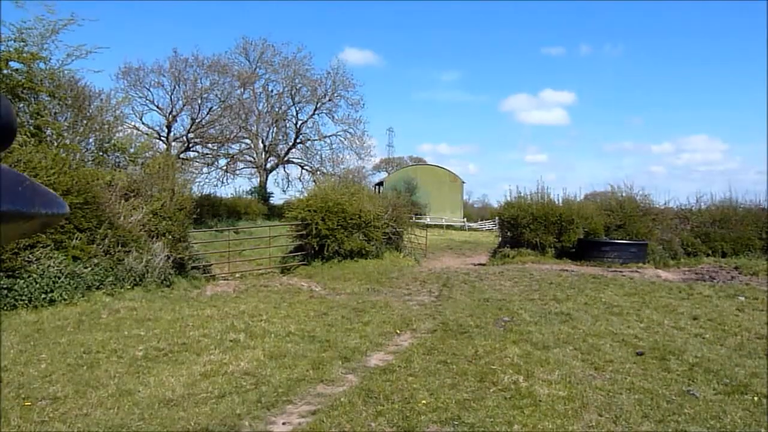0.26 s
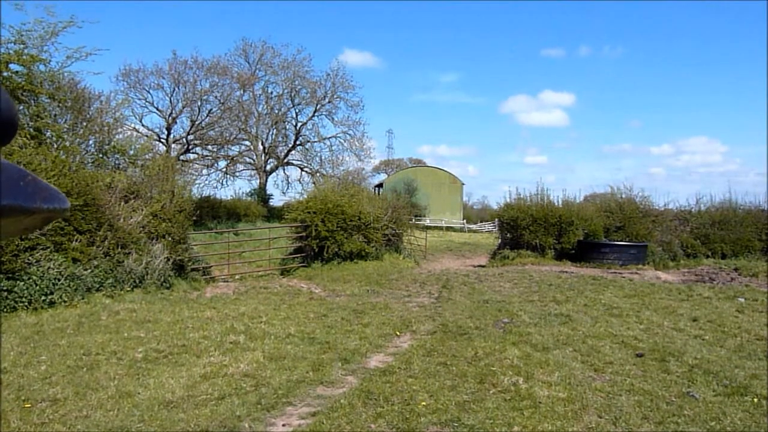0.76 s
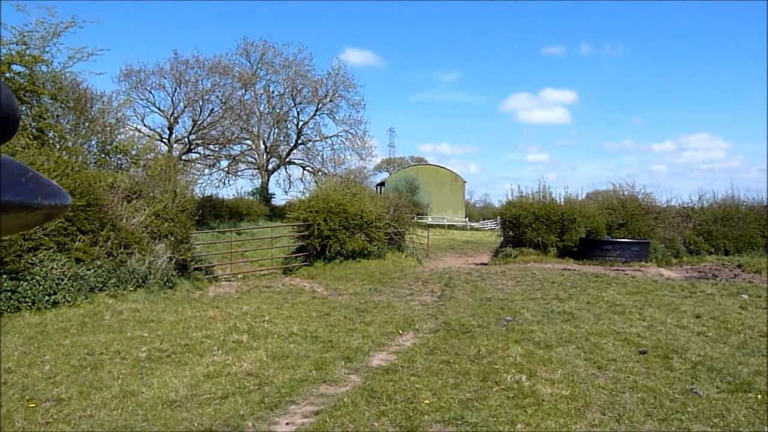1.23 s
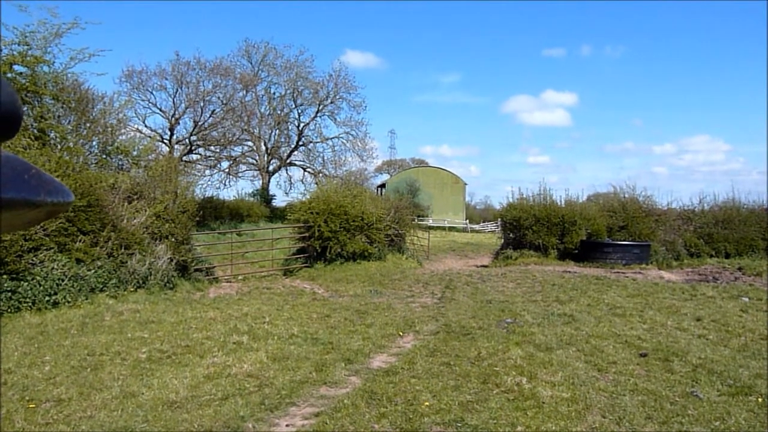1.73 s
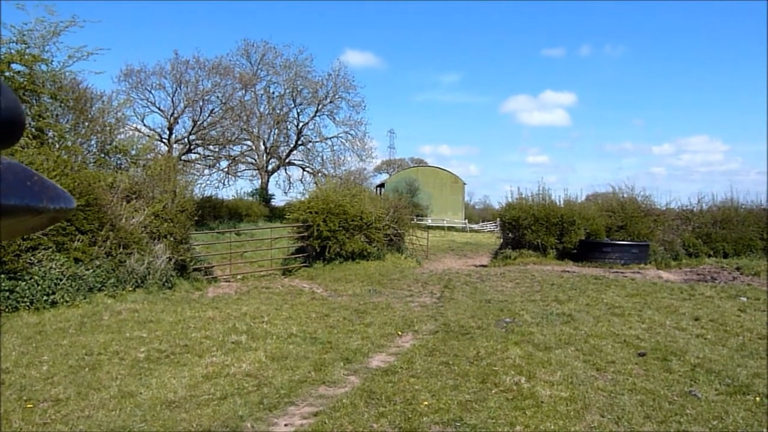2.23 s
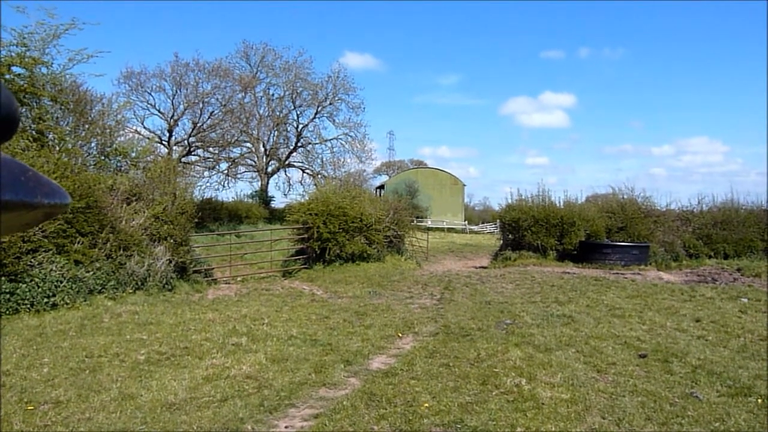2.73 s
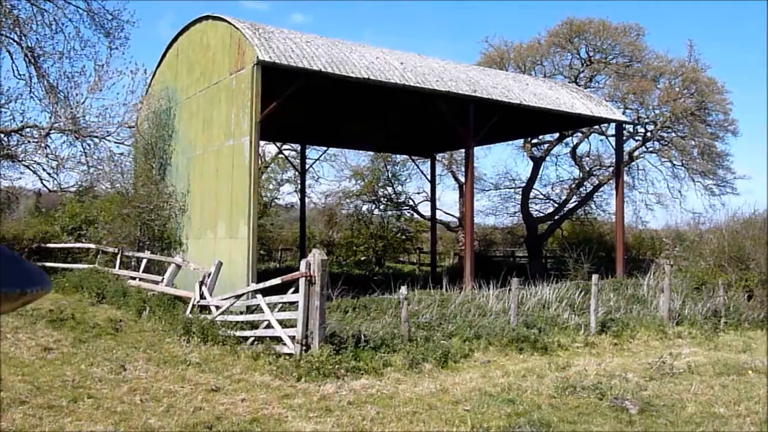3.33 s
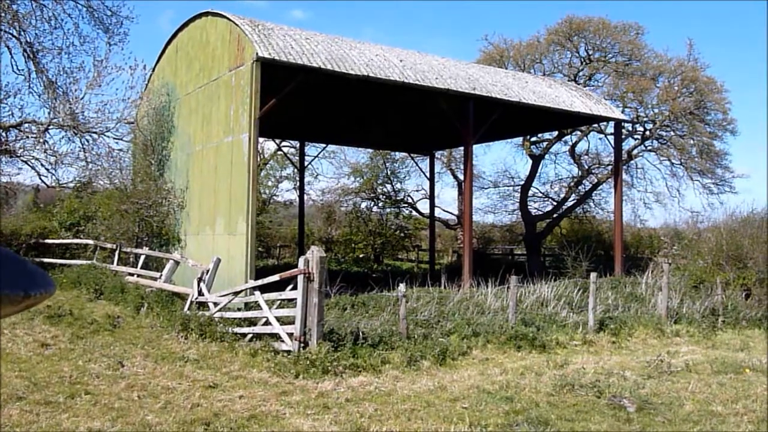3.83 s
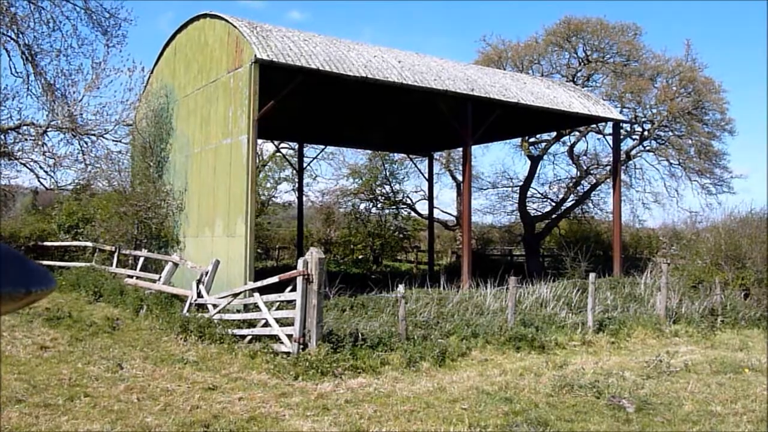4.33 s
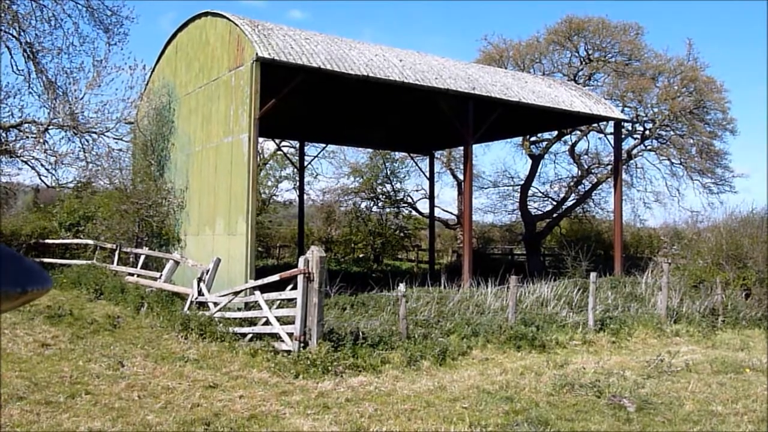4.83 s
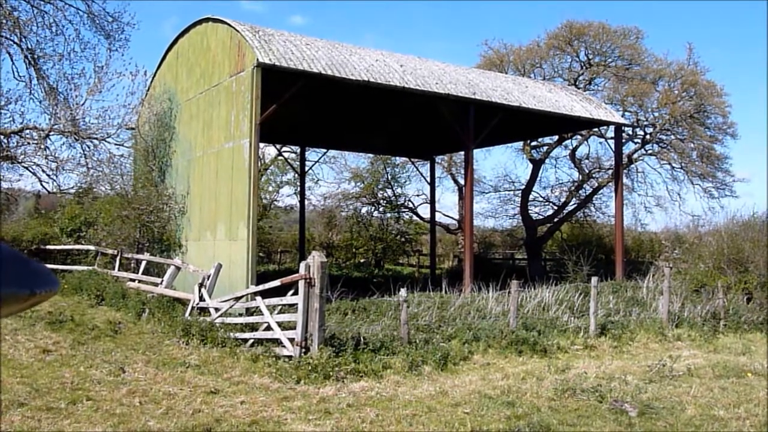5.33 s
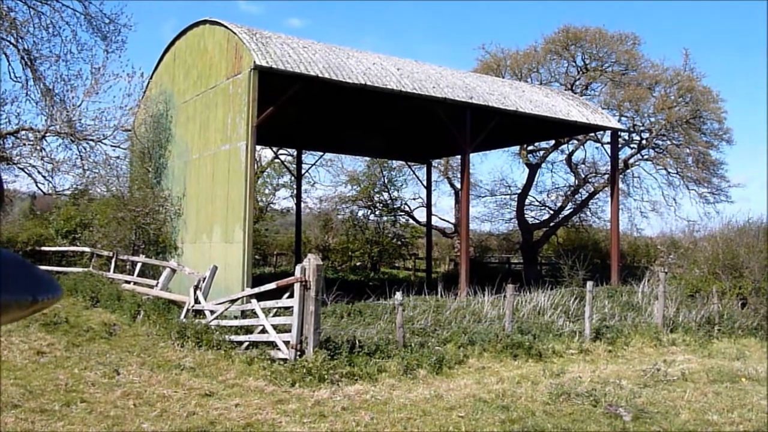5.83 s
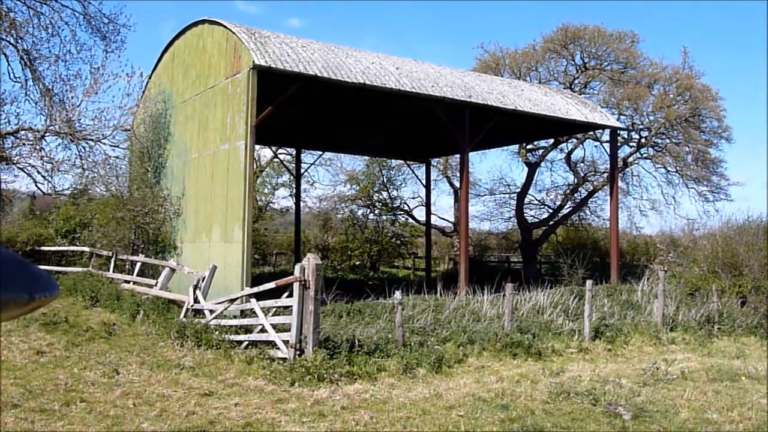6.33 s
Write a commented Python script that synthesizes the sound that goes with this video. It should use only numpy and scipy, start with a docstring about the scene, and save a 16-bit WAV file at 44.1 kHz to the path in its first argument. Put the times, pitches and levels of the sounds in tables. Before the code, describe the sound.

A small stereo microphone in an open grass field is buffeted by wind throughout. Low rumble and fluttering thumps, mostly below about 500 Hz, come in irregular bursts and lean left or right, with dry snaps and fine grit. A very brief dropout occurs at 0.05 s. Faint birds sit behind: a wavering warble at 0.55-0.75 s, thin falling whistles at about 1.1, 1.4, 1.7 and 2.0 s, and scattered chirps. The heaviest thumps and crunchy crackles cluster at 2.5-2.8 s. At 3.08 s a click marks a join; the soft background hush becomes fuller. Quick trills follow at about 3.1, 4.0, 5.0 and 6.0 s, the later ones introduced by rising notes. Arching whistles come at 3.4, 4.4, 5.4 and 6.3 s, with low whistles, husky notes and a small buzz near 3.9 s. Wind eases around 4.5 and 5.5-5.9 s, then thumps and snaps return from 6.0 s until the end at about 6.6 s.

```python
"""Wind rumbles and flutters first, on the two ports of a small stereo microphone carried over a grass field.
Eddies are shaped noise; buffets are short resonant bursts; dry snaps and grit are filtered pressure kinks.
Behind lie a soft hush of half-octave noise and small birds, near-sines that whistle, chirp, warble and trill.
Far sounds sink under loud wind; the sound drops out briefly near the start and a join clicks midway."""
import sys
import numpy as np
from scipy import signal
from scipy.io import wavfile
from scipy.ndimage import uniform_filter1d

SR = 44100
rng = np.random.default_rng(int(sys.argv[2]) if len(sys.argv) > 2 else 0)


def dump_mix(stems):
    """Bounce the given channels to the path in sys.argv[1] as a 16-bit WAV at rate SR."""
    frames = np.atleast_2d(stems).T  # one column per channel
    limited = np.clip(frames, -1, 1)  # hard clip at full scale
    pcm = np.round(limited * 32767).astype(np.int16)
    wavfile.write(sys.argv[1], SR, pcm)


def gain_from_decibels(decibels):
    """Convert decibel values to linear amplitude factors."""
    exponent = np.asarray(decibels, float) / 20
    return 10 ** exponent


N = 290001
T = np.arange(N) / SR
JOIN_S = 3.0755   # a click; from here the low hush is fuller and the songs are heard
GUST_DB = -23.5   # flutter level in the wind table that counts as a gust


def rms_one(x):
    """Normalisation: each channel is scaled to unit root-mean-square."""
    return x / np.sqrt(np.mean(x ** 2, axis=-1, keepdims=True) + 1e-20)


def in_time(rows, t=T):
    """Linear interpolation: every column after the first becomes a curve over time."""
    s, *columns = np.transpose(rows)
    return [np.interp(t, s, c) for c in columns]


def at_hz(points, hz):
    """Spectral interpolation: level is read off along a logarithmic frequency axis."""
    points = np.array(points)
    return np.interp(np.log(hz), np.log(points[:, 0] + 1), points[:, 1])


def cut(x, hz, kind, order=2):
    """Linear filtering: a Butterworth low-, high- or band-pass."""
    return signal.sosfilt(signal.butter(order, hz, kind, fs=SR, output="sos"), x)


def drift(rate_hz, channels=1):
    """Slow random modulation: noise at every 40th sample through a double one-pole low-pass; spread 1."""
    r = np.exp(-80 * np.pi * rate_hz / SR)
    white = rng.standard_normal((channels, N // 40 + 502))
    slow = signal.lfilter([1], [1, -2 * r, r * r], white)[:, 500:]   # past the filter's start
    return np.array([np.interp(np.arange(N) / 40, np.arange(len(row)), row) for row in rms_one(slow)])


def bands(low_hz, high_hz):
    """Band synthesis: half-octave bands of left and right noise, each of rms 1, with its centre/Hz."""
    edges = low_hz * 2 ** np.arange(0, np.log2(high_hz / low_hz) + .5, .5)
    white = rng.standard_normal((2, 2, N))   # neighbouring bands draw on different noise
    for k, pair in enumerate(zip(edges, edges[1:])):
        yield np.sqrt(pair[0] * pair[1]), rms_one(cut(white[k % 2], pair, "band"))


def sing(out, rows, bend=None, husky=.1, fade_s=.007, size=600):
    """Frequency modulation: adds a near-sine; bend(t) offsets pitch/Hz and scales gain, huskiness roughens."""
    i = np.arange(round(rows[0][0] * SR), min(round(rows[-1][0] * SR), N))
    hz, db = in_time(rows, i / SR)
    hz = uniform_filter1d(hz, size, mode="nearest")   # the pitch bends, it has no corners
    shift, gain = bend(i / SR - rows[0][0]) if bend else (0, 1)
    fade = np.clip(np.minimum(i - i[0], i[-1] - i) / (fade_s * SR), 0, 1)
    rough = 1 + husky * rms_one(cut(rng.standard_normal(len(i)), 250, "low"))
    waver_hz = 250 * husky * rms_one(cut(rng.standard_normal(len(i)), 120, "low"))
    phase = 2 * np.pi * np.cumsum(hz + shift + waver_hz) / SR
    note = np.sqrt(2) * gain_from_decibels(db) * gain * fade * rough * np.sin(phase)
    return out + np.bincount(i, note, N)


def bent(s, length, start_hz, middle_hz, end_hz, db):
    """Parabolic glide: rows of a note through three pitches, 3 dB softer at both ends."""
    u = np.linspace(0, 1, 9)
    parabola = np.polyfit([0, .5, 1], [start_hz, middle_hz, end_hz], 2)
    return np.transpose([s + length * u, np.polyval(parabola, u), db - 3 * (2 * u - 1) ** 2])


# Strength of the wind on the ports, before the layer gains: [t/s, flutter level/dB, rumble level/dB]
WIND = [(0.08, -35.5, -32), (0.23, -20, -27), (0.27, -29.5, -35.5), (0.35, -21, -30), (0.46, -41, -33.5),
        (0.55, -18.5, -30), (0.6, -41, -36), (0.66, -17, -30), (0.69, -37.5, -25), (0.71, -22, -38),
        (0.75, -39.5, -38.5), (0.88, -40, -26), (0.97, -45, -37.5), (1.02, -36.5, -23),
        (1.15, -38.5, -32.5), (1.2, -21.5, -25), (1.25, -26, -38.5), (1.32, -33, -33), (1.37, -27.5, -31.5),
        (1.55, -40.5, -32.5), (1.595, -19.5, -27.5), (1.64, -37.5, -27), (1.68, -23.5, -30.5),
        (1.78, -30.5, -31), (1.92, -36.5, -37.5), (2.02, -31.5, -27.5), (2.05, -20.5, -27),
        (2.07, -50.5, -39), (2.29, -47, -31.5), (2.34, -22, -30.5), (2.45, -35.5, -35), (2.49, -26, -36.5),
        (2.6, -29, -29.5), (2.62, -42.5, -45.5), (2.65, -31.5, -37.5), (2.81, -29, -30.5),
        (2.97, -28.5, -28.5), (3.03, -27.5, -31), (3.1, -52, -44.5), (3.17, -40.5, -25.5),
        (3.21, -23.5, -36), (3.26, -38, -33), (3.43, -31, -29), (3.66, -35.5, -35.5), (3.73, -29.5, -24.5),
        (3.77, -39, -38.5), (3.9, -27.5, -37), (3.95, -39, -32.5), (4.08, -30.5, -32.5),
        (4.09, -34.5, -32.5), (4.55, -52, -39.5), (4.6, -42, -33.5), (4.66, -29.5, -29.5),
        (4.7, -26, -25.5), (4.75, -26.5, -36.5), (4.78, -40, -35.5), (4.82, -39.5, -34), (4.93, -62, -42.5),
        (5.04, -43, -33.5), (5.07, -26, -28.5), (5.16, -26.5, -29), (5.2, -37, -43.5), (5.27, -23, -30),
        (5.44, -41.5, -38.5), (5.45, -55.5, -46), (5.8, -38.5, -32.5), (6.0, -38, -39), (6.03, -21, -36),
        (6.16, -37, -28), (6.18, -28, -46), (6.25, -23, -31), (6.3, -22, -29.5), (6.39, -45.5, -39),
        (6.47, -27, -38), (6.5, -24.5, -23.5), (6.58, -31, -40.5)]
# Mean spectrum of the eddies, relative: [f/Hz, spectral density level/dB per Hz]
TURBULENCE = [(15, -41), (25, -4), (112, 4.5), (277, 6), (430, -5), (475, -7), (1190, -71), (1750, -60.5),
              (3000, -53), (3900, -78), (6600, -120)]


def wind():
    """Turbulence: eddies in lumps shake all bands, upper ones hardest; each port gets its own share."""
    lump_db, lump_db_per_octave, own_db = 2.5, 2.5, 1.5
    apart, reach = 0.63, 2.04   # share of each port alone; limit of the lumps
    rumble_gain_db, flutter_gain_db = 6, 4
    veer_db, veer_hz = 4, 7.6   # the wind veers at random between the ports
    flutter_db, rumble_db = in_time(WIND)
    common = 0.44 * drift(27) + drift(90)
    lumps = rms_one(common + apart * (drift(23, channels=2) + drift(66, channels=2)))
    lumps = reach * np.tanh(lumps / reach)   # the largest bursts are the buffets
    rumble, flutter = 0, 0
    for hz, noise in bands(26.16, 1700):
        octaves = max(np.log2(hz / 90), 0)
        depth_db = lump_db + lump_db_per_octave * octaves
        band_db = at_hz(TURBULENCE, hz) + depth_db * lumps + own_db * drift(15, channels=2)
        band = noise * np.sqrt(hz) * gain_from_decibels(band_db)   # bandwidth grows with the centre
        band *= gain_from_decibels(.45 * max(np.log2(hz / 400), 0) * (flutter_db - GUST_DB))   # faster air is brighter
        upper = np.clip(octaves - .6, 0, 1)
        rumble = rumble + (1 - upper) * band
        flutter = flutter + upper * band
    rumble = rms_one(rumble) * gain_from_decibels(rumble_db + rumble_gain_db)
    flutter = rms_one(flutter) * gain_from_decibels(flutter_db + flutter_gain_db)
    return (rumble + flutter) * gain_from_decibels(veer_db * drift(veer_hz) * [[.5], [-.5]])


def grit():
    """Impulse noise: small random kinks ride on the flutter, louder and denser as it strengthens."""
    per_s, level_db = 600, -34   # at gust strength
    size_follows, rate_follows = 0.27, 0.17   # dB per dB of flutter
    gust_db = in_time(WIND)[0] - GUST_DB
    born = rng.random((2, N)) < per_s * gain_from_decibels(rate_follows * gust_db) / SR
    sizes = gain_from_decibels(4 * np.minimum(rng.exponential(1, (2, N)), 3)) * rng.choice([-1, 1], (2, N))
    kinks = born * sizes * gain_from_decibels(size_follows * gust_db + level_db) + 1e-18
    sharp_edge = gain_from_decibels(-18.5) * cut(kinks, 2400, "low")
    return cut(cut(kinks, 1300, "low", order=3) + sharp_edge, 440, "high", order=1)


# Colour of the open-air hush, relative: [f/Hz, spectral density level/dB per Hz]
HUSH_COLOUR = [(200, 22.5), (500, 25), (1100, 20.5), (1700, 4.5), (2800, 4), (5000, 0), (7000, -10),
               (8000, 2)]


def hush():
    """Diffuse field: far leaves and air make smooth noise, partly common to both sides."""
    alike, patchy_db = .2, .5
    level_db = -69   # of its 5.5 to 7 kHz part, before ducking
    out = 0
    for hz, noise in bands(206, 8000):
        before_join_db = -7 * (hz < 1800) * (T < JOIN_S)
        out = out + noise * np.sqrt(hz) * gain_from_decibels(at_hz(HUSH_COLOUR, hz) + patchy_db * drift(1.4) + before_join_db)
    out = out + alike * out[::-1]
    return out / np.std(cut(out, [5500, 7000], "band", order=4)) * gain_from_decibels(level_db)


def ducking(air):
    """Automatic gain: far sounds sink at once with loud wind and swell back at a steady rate."""
    above_db, share, recover_db_per_s = -25, 0.88, 21.5
    level_db = 10 * np.log10(uniform_filter1d(np.mean(air ** 2, axis=0), size=800) + 1e-12)
    depth_db = share * np.maximum(level_db - above_db, 0) + recover_db_per_s * T
    return gain_from_decibels(recover_db_per_s * T - np.maximum.accumulate(depth_db))


# Dry snaps at the sharpest pressure tips, before gains and filters:
# [t/s, level/dB, bright tick against it: level/dB, left-right level/dB]
SNAPS = [(0.0362, -30.5, -1.5, -2.5), (0.0755, -30.5, -14, -4.5), (0.1234, -28.5, -24, 3.5),
         (0.144, -41, -18, -11), (0.166, -23.5, -23.5, -1), (0.223, -44, -22, -5), (0.2414, -41, -31, 3.5),
         (0.2825, -31, -30, -9.5), (0.302, -22, -31, 0.5), (0.3174, -47, -22, -3), (0.3434, -35, -25, 3),
         (0.4125, -42, -14, -1), (0.453, -51, -17, 3), (0.5447, -39, -32, 9.5), (0.562, -32.5, -28, 3.5),
         (0.6634, -29, -15, -4.5), (0.687, -40, -26, 3), (0.714, -24.5, -14.5, 1),
         (0.7195, -33.5, -23, 6.5), (0.857, -28, -16, -6), (0.888, -47.5, -16, 6.5),
         (1.0146, -31, -21, 5.5), (1.0525, -27, -21, 1.5), (1.2072, -29, -43, -3), (1.339, -42, -17, -5.5),
         (1.3673, -32, -15, 1.5), (1.4441, -52, -15, -11), (1.4827, -22, -13.5, -7.5),
         (1.6705, -37, -27, 0), (1.7482, -34.5, -36, 2), (1.7714, -33, -21, 2), (1.8535, -37.5, -38, 4.5),
         (2.0016, -45, -17, 6.5), (2.048, -36.5, -15, 2), (2.3428, -18, -22.5, -3), (2.4724, -50, -28, -9),
         (2.4854, -23, -14, 3.5), (2.52, -5, -31, -7.5), (2.5465, -29, -27, -4), (2.583, -17.5, -21, -5),
         (2.5917, -16.5, -22, -5), (2.608, -39, -14, -2), (2.6355, -10.5, -17, -12),
         (2.6514, -33, -24.5, 2.5), (2.6698, -28, -37, 4), (2.703, -47, -9, -2), (2.7336, -30.5, -17, 6.5),
         (2.7377, -42, -11, 7), (2.745, -44, -14, -4), (2.7576, -29, -24, 4.5), (2.7836, -31, -35, -0.5),
         (2.807, -46.5, -5, -3), (2.9319, -24, -23, -0.5), (3.025, -29, -45, 0.5),
         (3.1991, -18.5, -17.5, -7), (3.4391, -26, -18.5, 2), (3.482, -31.5, -19, -0.5),
         (3.5387, -34.5, -7.5, -6.5), (3.5602, -29.5, -23, 9), (3.7299, -19, -23, -8),
         (3.8901, -42, -11.5, 6), (4.0613, -21, -16, -6), (4.152, -40.5, -22, 6.5),
         (4.6643, -23, -20.5, -3.5), (4.6885, -50.5, -18, -10), (4.696, -25, -22, 7.5),
         (4.7397, -27, -41, 3.5), (5.0613, -32, -17, 8), (5.0845, -37.5, -21, 10), (5.091, -21.5, -38, 2.5),
         (5.1123, -28, -34, 5), (5.1276, -26, -38, 3), (5.141, -24.5, -11, -7.5), (5.1522, -30.5, -36, 3),
         (5.1724, -25, -45, 5.5), (5.234, -44, -37, -5), (5.2639, -35.5, -39, 4.5), (5.2894, -33.5, -29, 6),
         (5.3174, -55, 0, 2.5), (5.3788, -24, -20, 0), (5.8567, -33, -26.5, 3), (6.0245, -43.5, -25, -16),
         (6.0284, -9.5, -24, -2.5), (6.0376, -36, -16, -3), (6.06, -13.5, -23, 0.5),
         (6.063, -43, -22.5, -12), (6.0675, -22.5, -39, 1), (6.089, -42, -29, 7), (6.2414, -19, -14, -11.5),
         (6.28, -40.5, -16, 6), (6.331, -22, -21.5, -3), (6.4662, -30, -33, 4), (6.487, -34, -11.5, 1),
         (6.5085, -47.5, -6, 7), (6.552, -53, -9, -4)]


def snaps():
    """Impulse response: a pressure kink gives a dull click and bright tick, then a weaker opposite pair."""
    body_gain_db, tick_gain_db = 27, 23
    lag_s, after_s, after_db = 0.00019, 0.0037, -10   # greatest port lag; scales of the second kink
    tick_late_s = .0012   # the tick sits on the tip of the dull click
    body, ticks, strength = np.zeros((3, 2, N + 900))
    chance = rng.random((len(SNAPS), 4))
    for (s, level_db, tick_db, pan_db), draw in zip(SNAPS, chance):
        for side in (0, 1):
            delays = lag_s * draw[side] + after_s * np.array([0, .5 + draw[2]])
            at = np.round((s + delays) * SR).astype(int)
            pair = np.array([1, -gain_from_decibels(after_db * draw[3])])
            size = gain_from_decibels(level_db + (1.5 - side) * pan_db) * pair
            strength[side, at[0]] += size[0]
            body[side, at] += size * gain_from_decibels(body_gain_db)
            tick_at = at + round((tick_late_s - lag_s * draw[side]) * SR)
            ticks[side, tick_at] += size * gain_from_decibels(tick_db + tick_gain_db)
    clicks = cut(body[:, :N] + 1e-18, 900, "low", order=3)
    dull = cut(clicks + scrunch(strength[:, :N]), 440, "high", order=1)
    return dull + cut(ticks[:, :N] + 1e-18, (1300, 3600), "band", order=1)


def scrunch(strength):
    """Envelope modulation: uneven noise swells just before each snap and dies after it."""
    level_db, swell_s, band_hz = -12, 0.0033, (600, 1560)
    t = np.arange(-2000, 2001) / SR
    swell = signal.fftconvolve(strength, np.exp(-np.abs(t) / swell_s)[None], "same", axes=1)
    noise = cut(rng.standard_normal((2, N)), band_hz, "band")
    noise = rms_one(cut(noise, band_hz[1], "low", order=3))
    return gain_from_decibels(level_db + 4 * drift(120, channels=2)) * swell * noise


# Thin high ticks, before the band-pass: [t/s, level/dB]
HIGH_TICKS = [(0.0375, -34), (6.5094, -29.5)]


def high_ticks():
    """Band-limited transient: noise under a two-sided exponential envelope, in a high band."""
    envelope = sum(gain_from_decibels(db) * np.exp(-np.abs(T - s) / .002) for s, db in HIGH_TICKS)
    return cut(envelope * rng.standard_normal((2, N)), (6260, 8200), "band")


# Buffets, before the last low-pass: [t/s, peak level/dB at the right port, f/Hz, left-right level/dB]
BUFFETS = [(0.074, -11.5, 207, 5.5), (0.279, -4.5, 368, -4), (0.335, -18.5, 262, -16),
           (0.65, -16.5, 332, -4), (0.708, -5.5, 272, 0), (0.791, -13.5, 150, 5.5), (0.882, -21, 216, 7.5),
           (1.014, -15.5, 145, 8.5), (1.049, -12, 215, 3.5), (1.197, -12, 143, -12),
           (1.29, -26.5, 304, 10.5), (1.48, -4.5, 221, -3), (1.571, -20.5, 397, 8.5), (1.674, -15, 289, 7),
           (1.743, -6.5, 159, -14), (1.994, -23.5, 215, 15.5), (2.044, -29, 275, 9), (2.335, -8.5, 182, -3),
           (2.481, -7.5, 297, 11.5), (2.546, -5, 292, -5.5), (2.583, -2, 245, -14), (2.629, -6.5, 396, 0.5),
           (2.666, -19.5, 293, 12), (2.729, -6, 360, -10), (2.815, -13.5, 313, 0), (2.932, -7, 200, -9.5),
           (2.95, -15, 280, -2), (3.194, -13, 349, 3.5), (3.378, -22, 148, -15), (3.474, -6, 156, -13),
           (3.711, -18, 161, 4), (3.859, -24.5, 227, 15), (3.887, -14, 174, 3.5), (4.056, -7, 333, -5),
           (4.147, -12.5, 200, 1.5), (4.465, -32.5, 254, 8.5), (4.644, -6, 180, -9), (4.69, -12, 288, 6.5),
           (4.732, -9.5, 280, -2), (5.061, -8, 241, 6), (5.111, -7.5, 415, -1.5), (5.136, -13.5, 387, 10),
           (5.231, -9, 437, -5), (5.312, -10, 259, -4.5), (5.376, -13.5, 339, 3), (5.419, -11, 254, 5),
           (6.027, -6.5, 230, -27), (6.054, -19.5, 203, 9.5), (6.172, -20, 252, 8.5), (6.221, -25, 234, 17),
           (6.278, -18, 260, 7.5), (6.46, -13.5, 250, 6)]


def buffets():
    """Damped resonance: a burst of pressure lasts a few cycles and hits the ports a little apart."""
    rise_s, fall_s, lag_s = 0.0018, 0.0048, 0.00086
    width, dull = 1.26, 1.96   # band edges and low-pass, as ratios to the pitch
    out, t = np.zeros((2, N + 3000)), np.arange(2000) / SR
    shape = np.exp(-t / fall_s) * (1 - np.exp(-t / rise_s))
    noise = rng.standard_normal((len(BUFFETS), 2, 2000))
    lags = np.abs(rng.standard_normal((len(BUFFETS), 2))) * lag_s
    for (s, peak_db, hz, pan_db), white, lag in zip(BUFFETS, noise, lags):
        burst = cut(white * shape, [hz / width, hz * width], "band", order=1)
        burst = cut(burst, hz * dull, "low")
        for side in (0, 1):
            at = round((s + lag[side]) * SR)
            gain = gain_from_decibels(peak_db + (1 - side) * pan_db)
            out[side, at:at + 2000] += gain * burst[side] / np.abs(burst[side]).max()
    return out[:, :N]


def far_chorus(level_db=-72, count=90):
    """Random superposition: faint short sweeps of distant birds, unrelated on the two sides."""
    out = np.zeros((2, N))
    for k, (when, pitch, glide, length, loud) in enumerate(rng.random((count, 5))):
        s = when * (N / SR - .1)
        hz, db = 2500 * 2 ** (1.15 * pitch), level_db + 8 * loud
        end = (s + .015 + .035 * length, hz * (.8 + .35 * glide), db)
        out[k % 2] = sing(out[k % 2], [(s, hz, db), end], husky=.4)
    return out


# Stretches of dense fine crackle, perhaps grass crushed under foot: [t/s, length t/s, level/dB]
CRUSH = [(.2, 0.206, -51), (1.17, 0.136, -53.5), (2.483, .13, -42.5), (2.724, 0.054, -46),
         (4.657, 0.11, -47.5), (5.054, 0.16, -43.5), (6.02, 0.077, -44)]


def crush():
    """Shot noise: dense clicks of uneven size, in clumps that fade in and out, partly opposed at the ports."""
    per_s, band_hz = 1800, (550, 1500)
    stretch = 0
    for s, length, db in CRUSH:
        stretch = stretch + gain_from_decibels(db) * np.clip(np.minimum(T - s, s + length - T) / .012 + 1, 0, 1)
    clicks = (rng.random((2, N)) < per_s / SR) * rng.standard_normal((2, N)) * gain_from_decibels(3 * drift(60))
    return stretch * rms_one(cut(clicks - .5 * clicks[::-1], band_hz, "band"))


# Short chirps: [t/s, length t/s, start f/Hz, middle f/Hz, end f/Hz, level/dB]
CHIRPS = [(.485, .02, 2580, 2650, 2760, -65), (.559, .024, 2830, 3000, 3150, -55),
          (.658, .044, 5270, 4850, 4250, -55), (.806, .028, 2380, 2650, 2760, -59),
          (.81, .04, 5200, 5450, 5600, -64), (.876, .022, 4200, 4600, 5200, -59),
          (.899, .025, 2730, 2950, 3110, -61), (.953, .03, 4170, 4050, 3900, -63),
          (1.08, .015, 2960, 3020, 3080, -57), (1.668, .022, 3830, 4250, 4680, -53),
          (1.82, .05, 4850, 4950, 4680, -63), (1.965, .04, 3520, 3870, 3390, -57),
          (3.49, .06, 2230, 2260, 2250, -63), (2.15, .02, 4000, 4150, 4050, -62),
          (2.5, .02, 4550, 4420, 4300, -62), (3.002, .016, 3850, 3500, 3150, -60),
          (3.58, .03, 2700, 2750, 2650, -61), (4.098, .02, 3280, 3470, 3560, -59),
          (4.995, .06, 4300, 4650, 4150, -61), (4.955, .015, 5800, 6000, 6200, -62),
          (5.547, .064, 4130, 4660, 4130, -58), (5.684, .027, 4220, 4180, 4130, -59),
          (5.866, .048, 4230, 4080, 3000, -63), (5.937, .074, 3800, 4620, 4150, -51),
          (6.087, .048, 3700, 3620, 3520, -55), (6.182, .046, 3330, 3150, 3080, -57),
          (6.226, .02, 3850, 4200, 4650, -59)]


def chirps(calls):
    """Frequency sweep: short notes glide along a parabola in pitch."""
    for row in CHIRPS:
        calls = sing(calls, bent(*row), husky=.17, size=100)
    return calls


# Warble: [t/s, middle f/Hz, level/dB]
WARBLE = [(0.531, 4800, -57), (0.544, 4180, -62), (0.62, 3850, -50), (0.7, 3670, -55.5), (0.758, 3930, -62)]


def warble(calls):
    """Vibrato: a gliding note whose pitch wavers as a cosine."""
    waver_hz, per_s, top_s = 150, 21.5, .57   # depth to either side, rate, time of one highest pitch

    def waver(t):
        """Sinusoidal modulation: the pitch offset about the middle."""
        return waver_hz * np.cos(2 * np.pi * per_s * (t + WARBLE[0][0] - top_s)), 1

    return sing(calls, WARBLE, waver, husky=.15, size=200)


# Shape of the falling whistle: [t/s into the call, f/Hz, relative level/dB]
FALL = [(0, 5300, 4), (.025, 4790, -7), (.125, 3920, -8), (.15, 3570, -1.5)]
# Its calls: [t/s, level/dB]
FALLS = [(1.12, -61), (1.392, -63.5), (1.696, -67), (2.001, -60.5)]


def falling_whistles(calls):
    """Downward glide: one pitch contour is repeated at several times and levels."""
    for s, db in FALLS:
        calls = sing(calls, np.array(FALL) + [s, 0, db], husky=.3)
    return calls


# Songs: [t/s, notes level/dB, trill level/dB, trill length t/s, trill rate f/Hz, upstroke f/Hz,
# gain of each trill note's second half]
SONGS = [(2.856, -55, -45, .235, 42.3, 1300, 1), (3.742, -59, -59, .32, 40.3, 600, .2),
         (4.752, -51, -46, .32, 40.3, 600, .2), (5.748, -61, -64, .27, 40.3, 600, .2)]


def songs():
    """Gating: this singer is heard only after the join."""
    return sum(song(*row) for row in SONGS) * (T > JOIN_S)


# Rising notes of a song: [t/s into the song, length t/s, relative level/dB]
RISING = [(0, .035, -2), (.07, .033, -3), (.135, .04, 0)]


def song(s, notes_db, trill_db, length, *note):
    """Frequency modulation: three rising notes, then a trill that settles in pitch and fades."""
    start_hz, end_hz, settle_s = 5600, 4580, .065   # trill
    after_s, fade_db_per_s = .225, 45   # trill
    out, t = np.zeros(N), np.linspace(0, length, 12)
    for after, held, db in RISING:
        first = (s + after, 4650, notes_db + db)
        last = (s + after + held, 5200, notes_db + db)
        out = sing(out, [first, last], size=100)
    hz = end_hz + (start_hz - end_hz) * np.exp(-t / settle_s)
    rows = np.transpose([s + after_s + t, hz, trill_db - fade_db_per_s * t])
    return sing(out, rows, lambda t: trill_note(t, *note), fade_s=0.0018)


def trill_note(t, per_s, rise_hz, second):
    """Periodic modulation: each note sweeps to its top, catches briefly and ends on a softer, sagging half."""
    beat = t * per_s % 1
    shift_hz = -rise_hz * np.exp(-beat / .14) - 300 * beat
    catch = 1 - .85 * np.exp(-((beat - .52) / .06) ** 2)
    fade = np.clip(beat / .08, 0, 1) * np.clip((.92 - beat) / .12, 0, 1)
    return shift_hz, fade * catch * (1 - .6 * beat) * np.where(beat > .52, second, 1)


# Long low whistles: [t/s, length t/s, start f/Hz, middle f/Hz, end f/Hz, level/dB]
WHISTLES = [(3.09, .05, 1750, 2100, 2400, -60), (3.14, .26, 2340, 2290, 2280, -63),
            (4.17, .2, 2000, 2090, 2030, -62), (4.365, .145, 2050, 1880, 1670, -57)]


def low_whistles(calls):
    """Slow glide: long near-sines follow a parabola in pitch."""
    for row in WHISTLES:
        calls = sing(calls, bent(*row), husky=.17, size=100)
    return calls


# Shape of the arching whistle: [t/s into the call, f/Hz, relative level/dB]
ARCH = [(0, 3150, -10), (.02, 3680, -7), (.04, 3880, -5), (.08, 3920, -4), (.125, 3850, -2), (.19, 3500, 0),
        (.25, 3100, -5), (.285, 2880, -14)]
# Its calls: [t/s, level/dB]
ARCHES = [(3.378, -59), (4.378, -55), (5.368, -59), (6.318, -61)]


def arching_whistles(calls):
    """Arched glide: one contour rises, then falls, at several times and levels."""
    for s, db in ARCHES:
        calls = sing(calls, np.array(ARCH) + [s, 0, db], husky=.14)
    return calls


# Husky notes: [t/s, length t/s, start f/Hz, middle f/Hz, end f/Hz, level/dB]
LOW_NOTES = [(3.733, .045, 2600, 2950, 3200, -57), (3.762, .068, 2850, 2650, 2750, -57),
             (3.785, .04, 2980, 2920, 2800, -58), (3.85, .018, 2650, 2750, 2800, -62),
             (4.11, .025, 2150, 2350, 2250, -60), (4.666, .025, 2250, 2200, 2150, -59),
             (4.74, .05, 2600, 2650, 2650, -58), (4.79, .028, 2850, 2600, 2310, -50),
             (4.83, .06, 2420, 2370, 2340, -59), (5.755, .04, 4750, 4620, 4550, -60),
             (5.982, .055, 2900, 3130, 3200, -55), (6.128, .105, 4470, 4420, 4400, -60)]


def husky_notes(calls):
    """Random modulation: strong roughness and pitch wobble make these notes husky."""
    for row in LOW_NOTES:
        calls = sing(calls, bent(*row), husky=.3, size=100)
    return calls


# Buzz: [t/s, f/Hz, level/dB]
BUZZ = [(3.889, 2800, -62), (4.03, 2750, -60)]


def buzz(calls):
    """Pulse train: a note broken into quick separate upward sweeps."""
    return sing(calls, BUZZ, buzz_note)


def buzz_note(t):
    """Periodic modulation: 88 pulses a second, each sweeping up through 1500 Hz."""
    beat = t * 88 % 1
    return 1500 * (beat - .5), np.sin(np.pi * beat) ** 2


def birds():
    """Reverberation: near birds from ahead, with a short smear of echoes from hedges."""
    calls = songs()
    for add in (chirps, warble, falling_whistles, low_whistles, arching_whistles, husky_notes, buzz):
        calls = add(calls)
    near = np.array([calls, np.roll(calls, 3)]) * gain_from_decibels([[.3], [-.3]])   # a little later at the right port
    echoes = rng.standard_normal((2, 5000)) * np.exp(-np.arange(5000) / (0.02 * SR))
    return near + gain_from_decibels(-38) * signal.fftconvolve(near, echoes, axes=1)[:, :N]


def scene():
    """Superposition: wind and its kinks in front, hush and birds ducked behind."""
    air = wind() + buffets()
    smooth_air = cut(air, 1080, "low", order=3)   # eddies carry little energy above this
    kinks = grit() + snaps() + high_ticks() + crush()
    gain = ducking(air)
    far = gain * (hush() + far_chorus())
    near_birds = gain ** .4 * birds()   # near birds sink less than the hush
    return smooth_air + kinks + far + near_birds


def join_click():
    """Relaxation: a step, unequal left and right, decays exponentially."""
    return np.outer(gain_from_decibels((-28.5, -18.5)), (T > JOIN_S) * np.exp(-np.abs(T - JOIN_S) / 0.0013))


def low_pass(x):
    """Removes everything above the highest recorded frequency."""
    return signal.sosfilt(signal.butter(12, 16510, fs=SR, output="sos"), x)


def record(dry):
    """Mid/side processing and saturation: middle widened, deep bass alike, peaks rounded, top cut; two edits."""
    top = .95   # peaks round off towards this
    silent_from_s, silent_to_s = .0473, .0773   # the sound drops out between these times
    mid, side = (dry[0] + dry[1]) / 2, (dry[0] - dry[1]) / 2
    side = side + (gain_from_decibels(6.5) - 1) * cut(side, (450, 1800), "band", order=1)
    side = cut(side, 35, "high", order=1)
    x = top * np.tanh(np.array([mid + side, mid - side]) / top)
    x = signal.sosfilt(signal.cheby2(8, 50, 8630, fs=SR, output="sos"), x)   # 50 dB down from 8630 Hz
    x *= np.clip(np.maximum(silent_from_s - T, T - silent_to_s) / .0001, 0, 1)
    x += join_click()
    return low_pass(x)


dry = scene()
out = record(dry)
dump_mix(out)
```